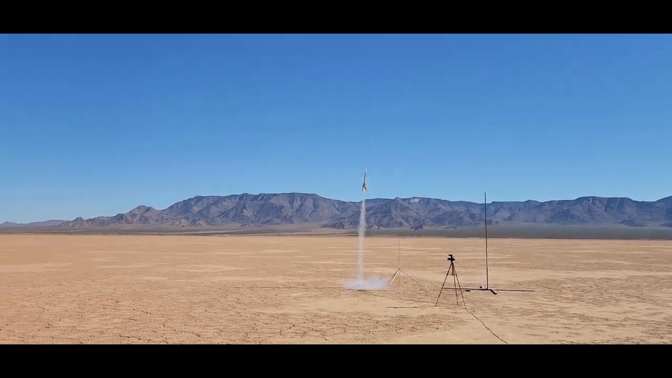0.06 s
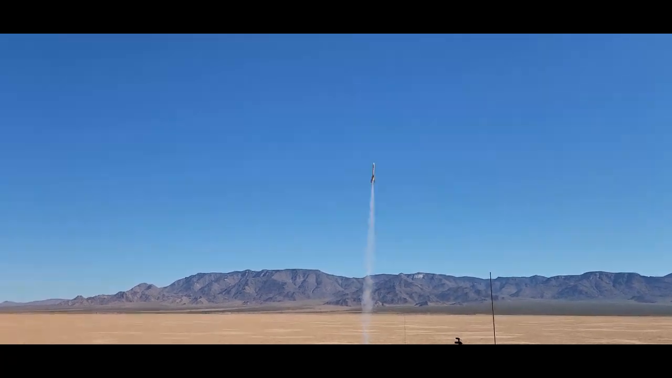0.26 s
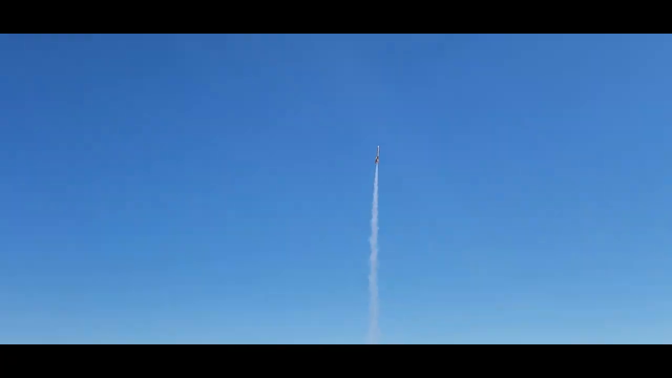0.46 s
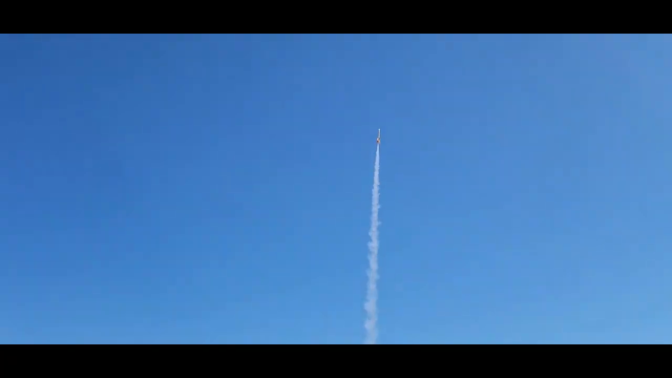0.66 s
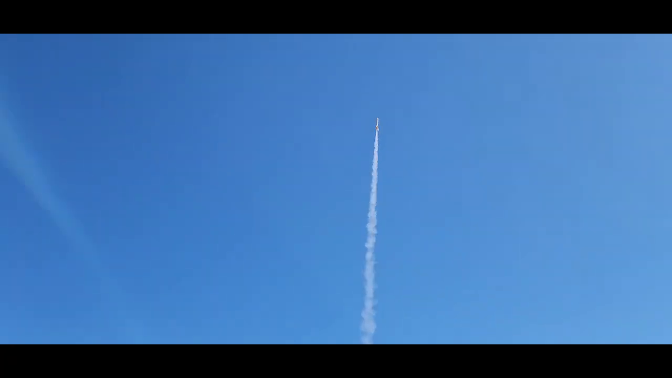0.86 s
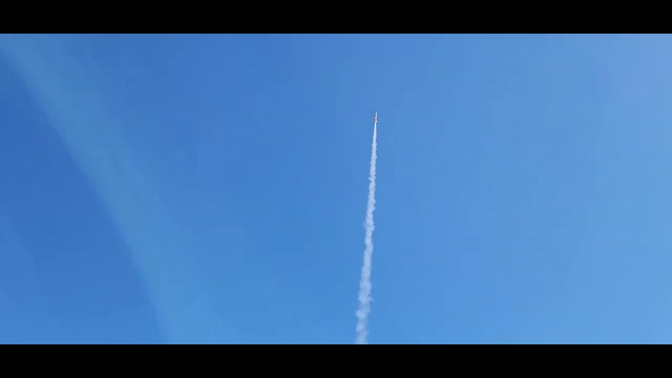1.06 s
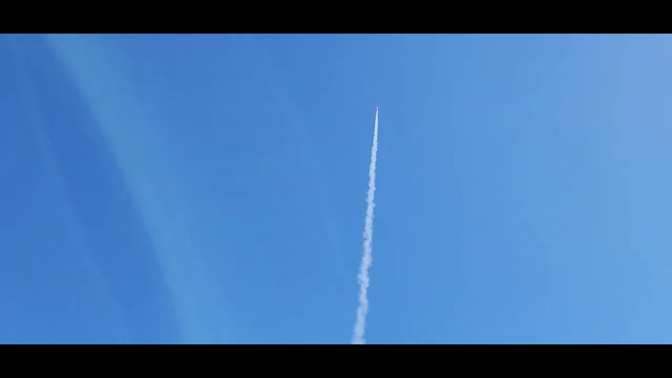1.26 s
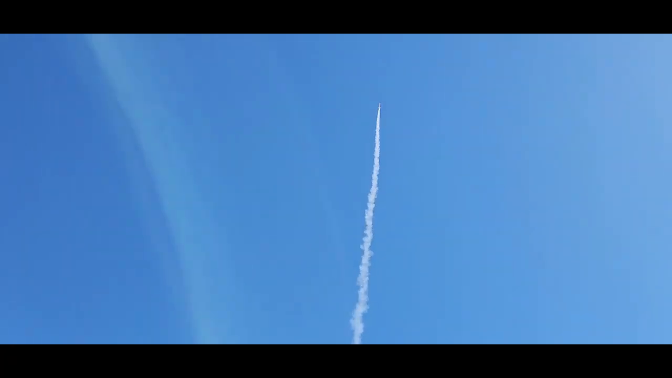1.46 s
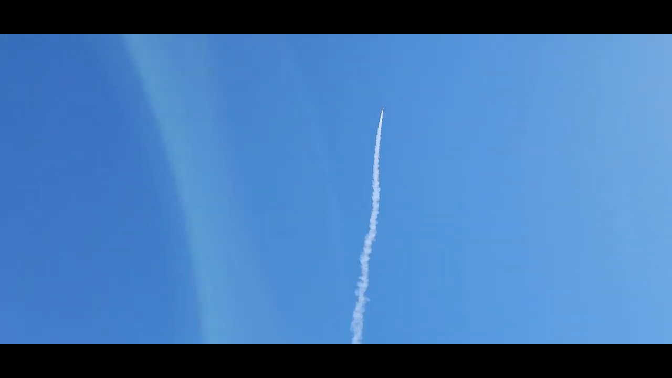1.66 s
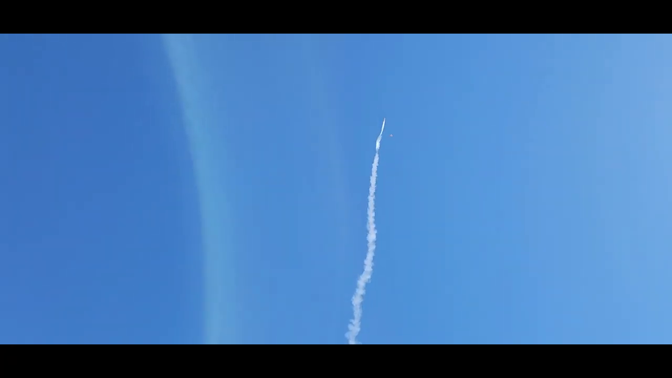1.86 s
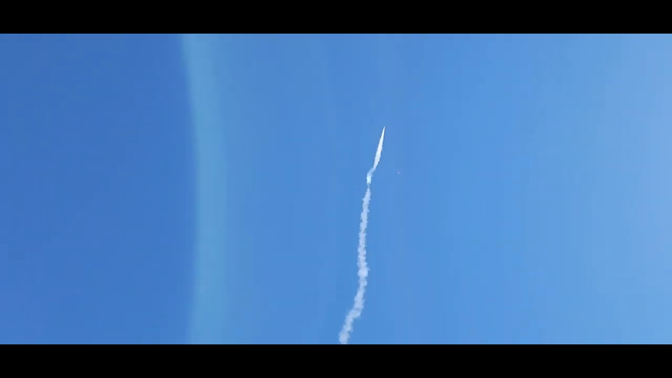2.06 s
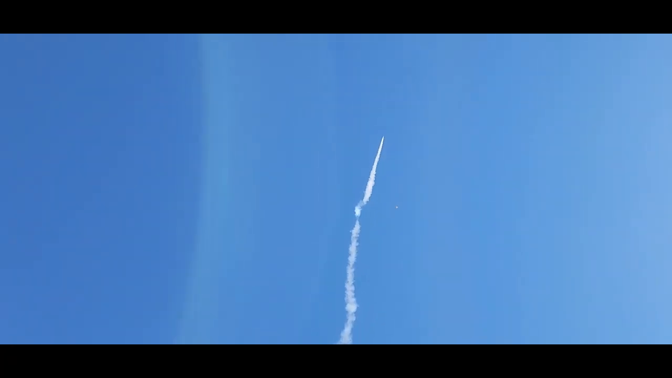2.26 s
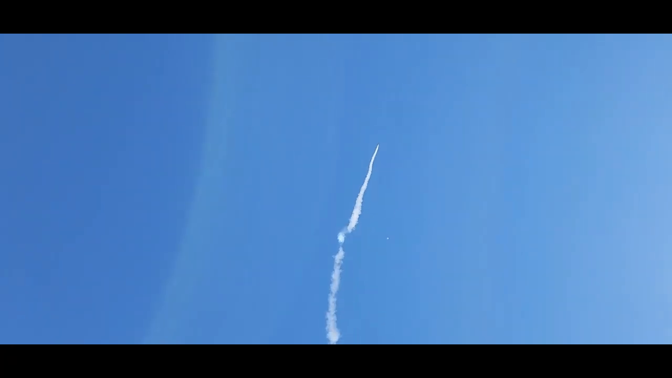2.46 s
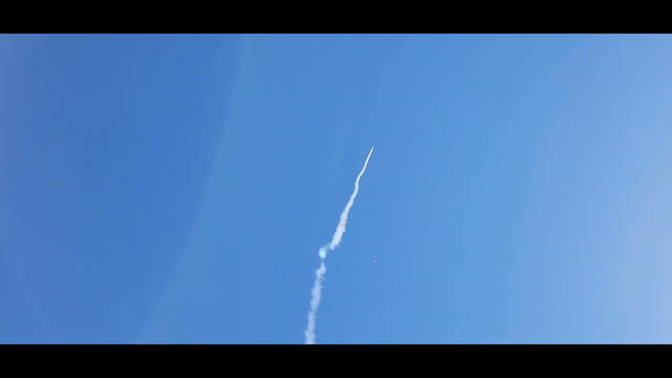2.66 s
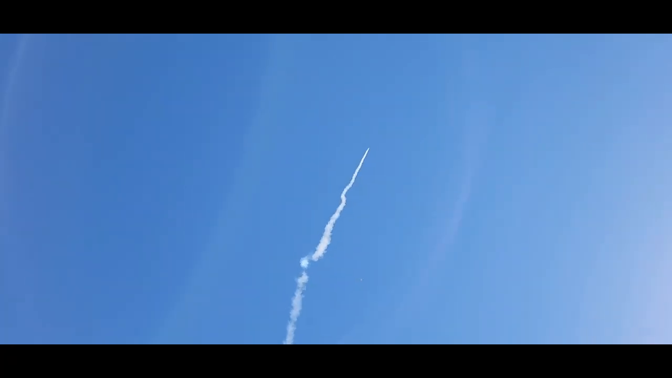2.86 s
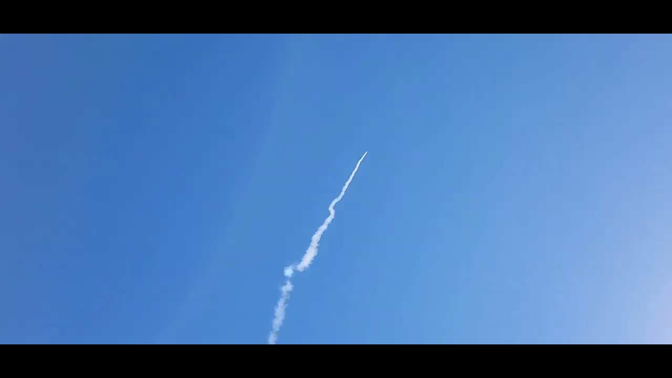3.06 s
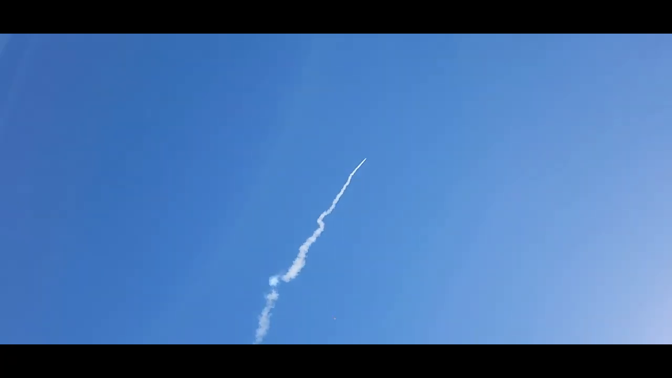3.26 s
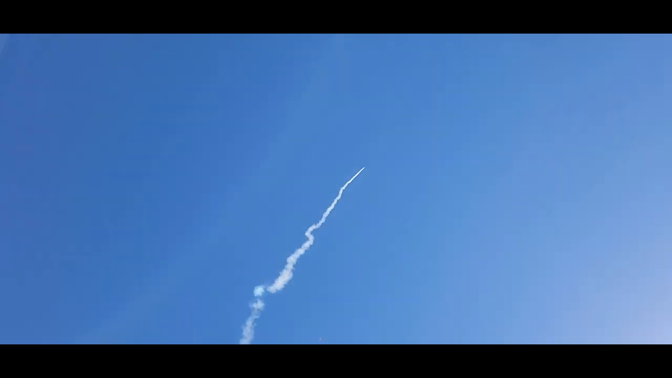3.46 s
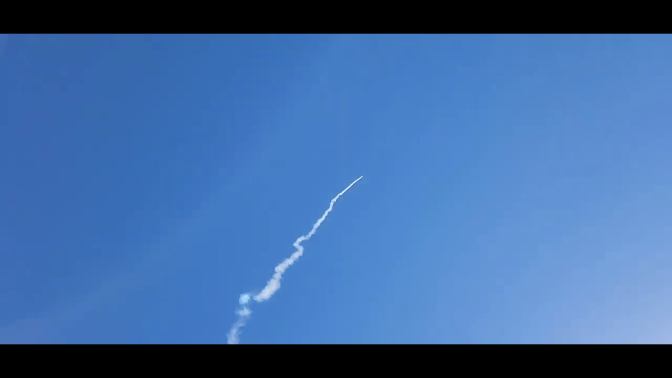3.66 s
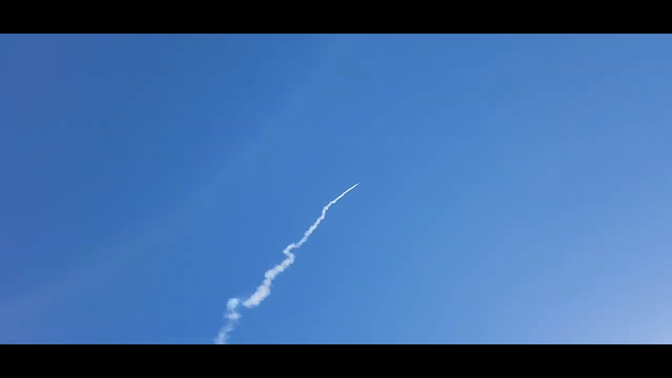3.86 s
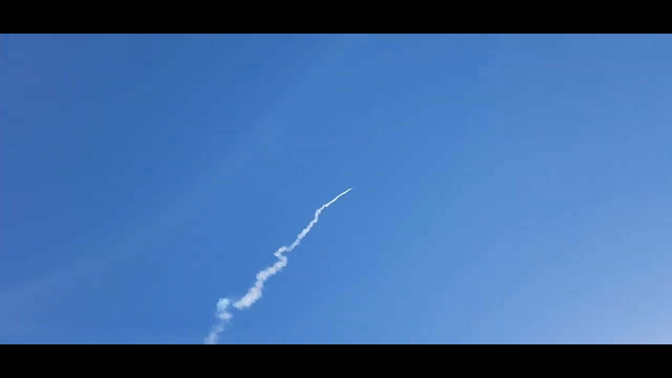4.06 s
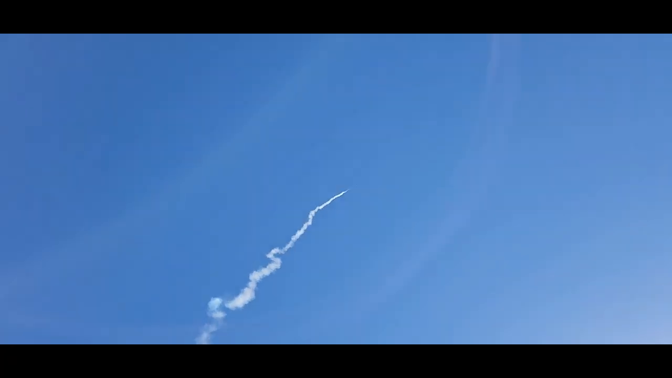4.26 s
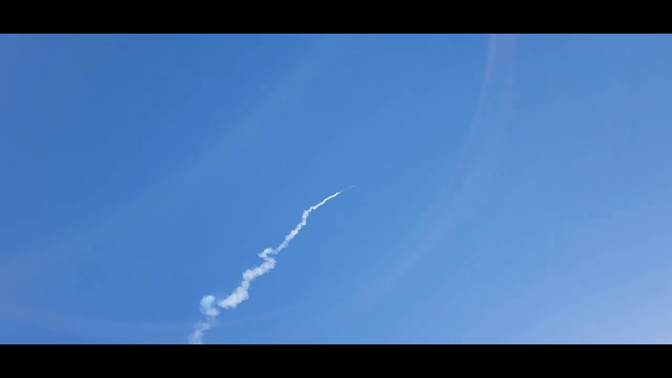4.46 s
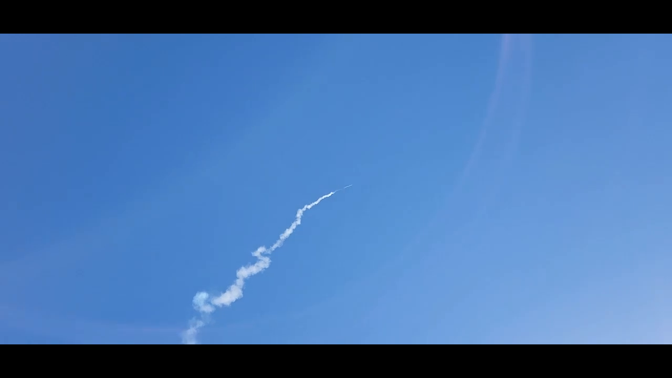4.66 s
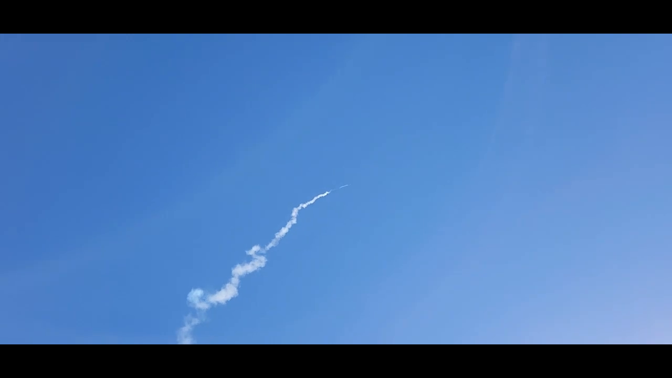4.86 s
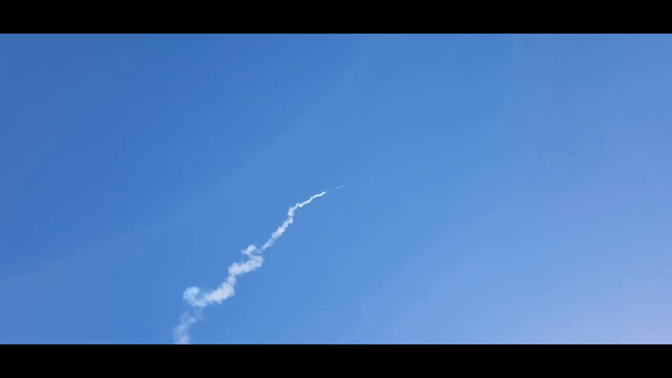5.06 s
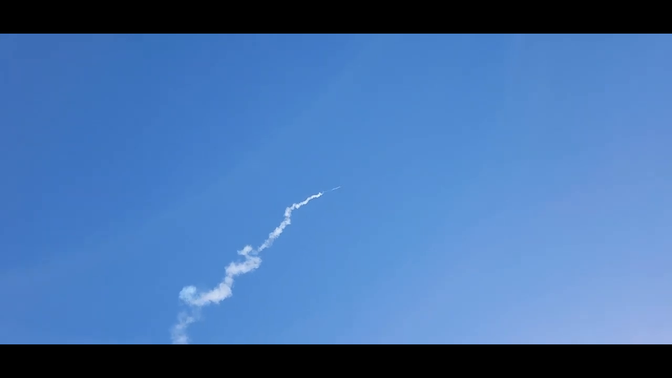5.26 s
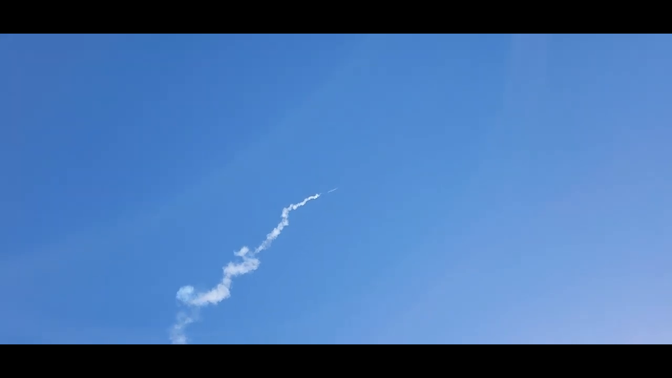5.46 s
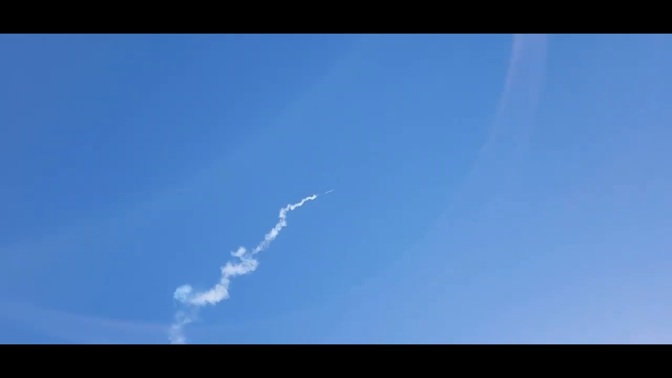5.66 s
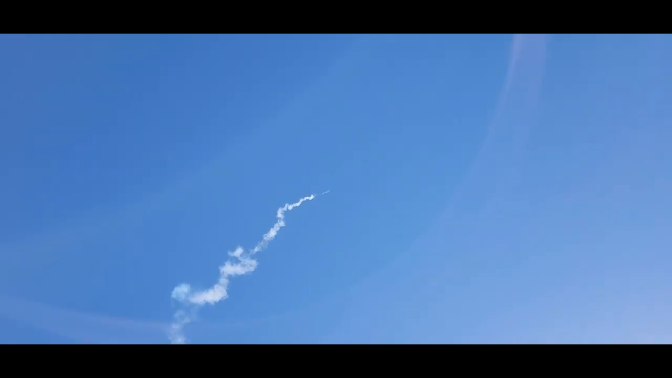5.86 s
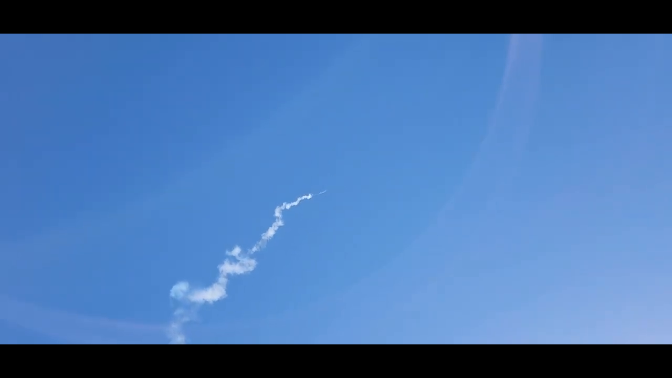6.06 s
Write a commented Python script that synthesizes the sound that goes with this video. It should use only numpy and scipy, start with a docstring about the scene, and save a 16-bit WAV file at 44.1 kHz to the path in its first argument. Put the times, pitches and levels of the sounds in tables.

```python
"""A two-stage model rocket climbs from a dry lake bed, heard by a hand-held stereo camera.
From 0 s the first motor's jet hisses and sputters; the lag of the ground echo grows with the climb,
sweeping a comb down through the hiss. At 1.76 s the motor cuts out. Near 2 s the second one catches,
flares with a low whump, then fades with height and burns out at 4.14 s. Two faint knocks follow.
Light wind rumbles on the microphone throughout and is left at the end, over a faint hiss."""
import sys
import numpy as np
from scipy import signal
from scipy.fft import rfft, irfft
from scipy.io import wavfile
from scipy.ndimage import uniform_filter1d, map_coordinates

SR = 44100
rng = np.random.default_rng(int(sys.argv[2]) if len(sys.argv) > 2 else 0)


def persist_wave(psi):
    """Save psi, clipped to +-1, as 16-bit WAV."""
    counts = np.round(np.clip(psi, -1, 1) * 32767).astype(np.int16)
    wavfile.write(sys.argv[1], SR, np.atleast_2d(counts).T)


N = 269563
FRAME, HOP = 512, 128
TIME_S, FRAME_S = np.arange(N) / SR, np.arange(N // HOP + 5) * HOP / SR
BINS_HZ = np.fft.rfftfreq(FRAME, 1 / SR)
JET_BAND_HZ, ROAR_BAND_HZ, SIZZLE_BAND_HZ = (2000, 4000), (400, 1400), (8000, 15000)

# Table levels are relative.
# exhaust spectra: freq_hz, density_db
FIRST_JET_SPECTRUM = [(100, -29), (300, -25.5), (700, -22.5), (1400, -17), (2000, -6.5), (2650, -1),
                      (3300, -3.5), (4100, -9), (5200, -9.5), (7500, -11.5), (11000, -16), (13000, -16),
                      (15500, -23)]
SECOND_JET_SPECTRUM = [(100, -33), (220, -32.5), (400, -21), (800, -16), (1400, -11.5), (1850, -6),
                       (2600, -4), (3600, -4), (5000, -10.5), (7500, -15.5), (9500, -21.5), (12000, -21),
                       (15500, -35.5)]
# reach of the roar and sizzle controls: freq_hz, weight
ROAR_WEIGHTS = [(150, 0.68), (450, 1.5), (800, 1.1), (1300, 0.9), (1900, 0)]
SIZZLE_WEIGHTS = [(3000, 0.0047), (4800, 0.53), (7500, 0.9), (11000, 1.325), (15000, 1.57)]
# uneven burning: centre_s, gain_db, half_width_s
SURGES = [(0.177, 2, 0.075), (0.51, 1.5, 0.072), (1.115, 1.34, .08), (2.39, 2, 0.056), (2.982, 1.46, 0.39),
          (3.621, 1.4, 0.039)]
# sputters of the fuel grain: start_s, level_db, tilt_db_per_octave
SPUTTERS = [(0.423, -26, 4.5), (0.578, -25.5, -2.5), (0.675, -29.5, -3), (0.748, -29, -2), (0.874, -31, -3),
            (0.962, -32.5, -3.5), (1.13, -28, -2.5), (1.767, -25.5, 0), (3.008, -34.5, 1.2), (3.16, -36, 3),
            (3.431, -37.5, 0.5), (3.455, -42.5, -6.5), (3.757, -35.5, 1), (3.947, -30.5, .5),
            (4.084, -38, 1.5), (4.102, -37.5, 1.5)]
# sputter colour: freq_hz, gain_db
SPUTTER_EQ = [(50, -18.5), (160, -1), (600, 1.5), (1400, 2.5), (2300, -9), (8000, -42)]
# ignition puff: freq_hz, density_db
WHUMP_SPECTRUM = [(120, -32), (230, -20), (340, -5.5), (560, -0.5), (800, -6.5), (1600, -34.5)]
# line of sight to the rocket: time_s, elevation_sine
CLIMB = [(0, 0.068), (.25, .22), (.5, 0.38), (.75, 0.56), (1, 0.71), (1.25, 0.88), (1.5, .86), (2, 0.92),
         (3, 0.97), (4, 0.9)]
# reflections near the camera: delay_s, gain
NEAR_ECHOES = [(.0014, 0.002), (.0028, 0.097), (.0045, 0.074), (.0069, .32), (.0075, -0.09)]
# port imbalance, source ahead and overhead: freq_hz, left_minus_right_db
BALANCE_AHEAD = [(300, 1), (900, -1), (1500, 6), (2700, -6), (3700, 0.5), (4800, -5), (6500, 0.5),
                 (9300, 2.5), (12500, -3), (14500, 8.5)]
BALANCE_OVERHEAD = [(300, 0.5), (1100, 0), (1900, -7), (2700, -7.5), (3400, -10), (4200, -0.5), (5200, 6),
                    (6500, 9), (8300, 8), (9300, 2), (10200, 1), (12500, 1), (14500, 7)]
# likeness of the two ports: freq_hz, coherence
PORT_COHERENCE = [(200, 1), (1000, 0.58), (1700, 0.63), (2600, .85), (3800, 0.51), (5000, 0.53), (9000, 1),
                  (12000, 0.33), (14500, 0.32)]
# port phase, source overhead: freq_hz, left_lead_rad
PORT_PHASE = [(200, -0.5), (1200, 0.45), (1900, -2.5), (2500, 0.5), (3200, 2), (3800, 4), (4600, 7),
              (8500, 7.5), (11000, 8.5), (15000, 12)]
# port peaks and dips, source ahead: centre_hz, width_hz, gain_db
PORT_RESONANCES = [(2270, 700, -5), (2856, 410, 3.5), (4484, 472, 0), (4953, 1300, 4.5), (9030, 1400, -7.5)]
# lake bed scatter: freq_hz, gain_db
SCATTER_EQ = [(200, -7), (1200, -5), (2300, -4.5), (3600, 3.5), (8000, 1.5), (15000, -7.5)]
# knocks after burnout: start_s, level_db
KNOCKS = [(4.318, -58), (4.346, -48.5)]
# ring of a knock: pitch_hz, level_db, t60_s
KNOCK_MODES = [(371, -4.5, 0.054), (1236, -8, .04), (2500, 6, 0.013)]
# gusts on the microphone: start_s, level_db, rise_s
GUSTS = [(.01, -40, 0.099), (.45, -45, 0.065), (.93, -54, 0.12), (3.5, -57.5, 0.28), (4.24, -54, 0.22),
         (4.96, -52, 0.16), (5.5, -58.5, .2)]
# wind rumble: freq_hz, density_db
WIND_SPECTRUM = [(15, -15.5), (30, -2.5), (50, 4), (80, -4), (180, -24.5), (300, -43), (800, -67.5)]
# still air and microphone hiss: freq_hz, density_db
HISS_SPECTRUM = [(200, -10), (400, -6), (1600, -9.5), (2050, -2.5), (3000, -5), (4600, -13), (5600, -12),
                 (6800, -18.5), (7600, -14.5), (9200, -32.5), (12500, -16), (15500, -16)]


def first_motor(build_s=.31, cutout_s=1.761, cut_length_s=.025, fizz_db_per_s=94):
    """Booster: builds up off the pad as its roar thins, then cuts out to a weak, broad fizz."""
    on_pad = np.exp(-FRAME_S / build_s)
    # sizzle beams sideways, so it drops as the nozzle turns to the camera
    turned = (1 + np.tanh((elevation(FRAME_S) - .63) / .17)) / 2
    spent = np.minimum(since(cutout_s) / cut_length_s, 1)
    level_db = -26 - 9.5 * on_pad + surges_db() - 36 * spent - fizz_db_per_s * since(cutout_s)
    roar_db = -18.5 + 6.5 * on_pad + 19 * spent
    sizzle_db = 5 - 11 * turned + 7 * spent
    return jet(FIRST_JET_SPECTRUM, level_db, roar_db, sizzle_db)


def second_motor(full_s=1.9945, flare_s=2.085, burnout_s=4.137, catch_db_per_s=420, die_db_per_s=311):
    """Upper stage: catches, flares, recedes, burns out. Distance dulls the sizzle; the roar carries."""
    burnt = np.minimum(since(full_s) / (burnout_s - full_s), 1)
    flare = np.exp(-((FRAME_S - flare_s) / .075) ** 4)
    thrust_db = -catch_db_per_s * np.maximum(full_s - FRAME_S, 0) - die_db_per_s * since(burnout_s)
    near = np.exp(-(since(full_s) / .87) ** 1.9)
    level_db = -27.5 + thrust_db + surges_db() + 7.5 * flare - 13.5 * burnt ** 1.71
    roar_db = -17.5 + 1.8 * flare + 9 * burnt ** 3.7
    sizzle_db = -24.5 + 15.5 * near - 4 * flare
    return jet(SECOND_JET_SPECTRUM, level_db, roar_db, sizzle_db)


def surges_db():
    """Uneven burning swells the thrust."""
    return sum(db * np.exp(-((FRAME_S - centre_s) / half_s) ** 2) for centre_s, db, half_s in SURGES)


def jet(spectrum, level_db, roar_db, sizzle_db, flutter_db=.6, twinkle_db=.39, crackle=.092):
    """Turbulent exhaust, two noise rows. Level sets the jet band; roar and sizzle are relative to it."""
    base_db = lookup(spectrum, BINS_HZ)
    base_db -= band_db(base_db, JET_BAND_HZ)
    bass_db = roar_db[:, None] - band_db(base_db, ROAR_BAND_HZ)
    treble_db = sizzle_db[:, None] - band_db(base_db, SIZZLE_BAND_HZ)
    treble_db += twinkle_db * wander(rate_hz=12)[:, None]
    field_db = base_db + bass_db * lookup(ROAR_WEIGHTS, BINS_HZ)
    field_db += treble_db * lookup(SIZZLE_WEIGHTS, BINS_HZ)
    field_db -= band_db(field_db, JET_BAND_HZ)
    field_db += (level_db + flutter_db * wander(rate_hz=14))[:, None]
    # steepened shock fronts give a fine crackle
    roughness = unit_rms(uniform_filter1d(rng.standard_normal(N), size=40))
    shocks = unit_rms(np.exp(crackle * roughness))
    spectra = air_turbulence(stft(shocks * rng.standard_normal((2, N))))
    return istft(spectra * gain_of(field_db[:spectra.shape[1]]) * np.sqrt(FRAME / 2))


def sputters(gain_db=11, pulse_s=.00028, puff_s=.005, pivot_hz=600):
    """Bits of fuel pass the nozzle: a pressure pulse and a ragged puff each."""
    out, t = np.zeros(N), np.arange(2000) / SR
    middle = len(t) // 2
    pulse = (1 - t / pulse_s) * np.exp(-t / pulse_s)
    octaves = np.clip(np.log2((np.fft.rfftfreq(len(t), 1 / SR) + 1) / pivot_hz), -2, 2)
    for start_s, db, tilt_db_per_octave in SPUTTERS:
        puff = .84 * rng.standard_normal(len(t)) * np.exp(-t / puff_s)
        spectrum = rfft(np.roll(pulse + puff, middle))
        pop = irfft(spectrum * gain_of(db + gain_db + tilt_db_per_octave * octaves))
        add(out, start_s - middle / SR, pop)
    return coloured(out, SPUTTER_EQ)


def whump(level_db=-38.5, centre_s=2.095, half_s=.05):
    """The igniting charge puffs out a short, low burst of gas."""
    swell = np.exp(-((TIME_S - centre_s) / half_s) ** 2)
    return gain_of(level_db) * swell * unit_rms(coloured(rng.standard_normal(N), WHUMP_SPECTRUM))


def elevation(time_s):
    """Sine of the rocket's angle above the horizon."""
    return np.interp(time_s, *np.transpose(CLIMB))


def overhead(time_s):
    """Near 0 with the rocket ahead, 1 once it is above."""
    return np.clip(elevation(time_s) / .71, 0, 1) ** 2


def air_turbulence(spectra, depth_db=1.58, patch_hz=420, patch_s=.11):
    """Turbulent air on the path makes narrow bands swell and fade."""
    along_time = np.fft.fftfreq(spectra.shape[1], HOP / SR)[:, None] * patch_s
    along_freq = np.fft.fftfreq(len(BINS_HZ), BINS_HZ[1]) * patch_hz
    blur = np.exp(-2 * (along_time ** 2 + along_freq ** 2))
    patches = np.fft.ifft2(np.fft.fft2(rng.standard_normal(spectra.shape[1:])) * blur).real
    return spectra * gain_of(depth_db * unit_rms(patches))


def ground_echo(x, zenith_lag_s=.01175, grazing_gain=.48, zenith_gain=.27):
    """Adds the ground reflection, later and weaker as the rocket rises."""
    up = elevation(TIME_S)
    reflected = coloured(x, [(1500, 2), (5000, 4), (14000, -6)])
    gain = grazing_gain + (zenith_gain - grazing_gain) * up
    return x + gain * delayed(reflected, zenith_lag_s * up)


def near_echoes(x, drift=.151, sway=.0032):
    """Things near the camera comb the hiss; the paths shift as it tilts and sways."""
    swaying = np.interp(TIME_S, FRAME_S, wander(rate_hz=.99))
    stretch = 1 + drift * (elevation(TIME_S) - 1) + sway * swaying
    thin = coloured(x, [(350, -9.5), (1400, .5)])  # small surfaces return little bass
    echoes = sum(gain * delayed(thin, delay_s * stretch) for delay_s, gain in NEAR_ECHOES)
    return x + (1 + overhead(TIME_S)) / 2 * echoes


def microphone_ports(x, overhead_db=1, ahead_lag_s=.00002):
    """The camera body colours, shades and delays each port by elevation. Row 0 of x reaches both."""
    shared, unshared = stft(x)
    up = overhead(FRAME_S[:len(shared), None])
    balance_db = (1.5 - up) * lookup(BALANCE_AHEAD, BINS_HZ) + up * lookup(BALANCE_OVERHEAD, BINS_HZ)
    balance = gain_of(balance_db)
    phasor = (1 - up) * np.exp(-2j * np.pi * BINS_HZ * ahead_lag_s)
    phasor += up * np.exp(-1j * lookup(PORT_PHASE, BINS_HZ))
    coherence = np.clip(lookup(PORT_COHERENCE, BINS_HZ), 0, 1)
    right = (coherence * shared + np.sqrt(1 - coherence ** 2) * unshared) * np.exp(1j * np.angle(phasor))
    ahead_db = sum(db * np.exp(-(2 * (BINS_HZ - hz) / width_hz) ** 2)
                   for hz, width_hz, db in PORT_RESONANCES)
    colour = gain_of((1 - up) * ahead_db + up * overhead_db)
    return istft(np.array([shared * balance, right]) * 2 / (1 + balance) * colour)


def lake_bed_scatter(x, early_db=-23, early_t60_s=.38, late_db=-30.5, late_t60_s=2.1):
    """Rough ground scatters a quick wash and a faint long one; air dulls the longer paths."""
    t = np.arange(SR) / SR
    response = 0
    for db, t60_s in [(early_db, early_t60_s), (late_db, late_t60_s)]:
        tail = rng.standard_normal((2, SR)) * gain_of(-60 * t / t60_s) * (t > .012)
        response += gain_of(db) * tail / np.linalg.norm(tail[0])
    spectra = stft(coloured(response, SCATTER_EQ))
    air_db = -9 * FRAME_S[:spectra.shape[1], None] * (BINS_HZ / 4000) ** 2
    return signal.fftconvolve(x, istft(spectra * gain_of(air_db)), axes=1)[:, :N]


def knocks(scrape_s=.003, left_db=-8.5, right_db=-3.5):
    """Small dull knocks: a brief scrape excites damped modes."""
    out, t = np.zeros(N), np.arange(3000) / SR
    ring = sum(gain_of(db - 60 * t / t60_s) * np.sin(2 * np.pi * hz * t) for hz, db, t60_s in KNOCK_MODES)
    for start_s, db in KNOCKS:
        scrape = rng.standard_normal(len(t)) * np.exp(-t / scrape_s)
        add(out, start_s, gain_of(db) * signal.fftconvolve(scrape / np.linalg.norm(scrape), ring))
    return out * gain_of([[left_db], [right_db]])


def wind(gain_db=-1, breeze_db=-65, eddy_db=1.34, width=.4):
    """Eddies buffet the ports, first more the left, later the right; gusts rise fast and ebb slowly."""
    mid, side = unit_rms(coloured(rng.standard_normal((2, N)), WIND_SPECTRUM))
    lean_db = np.linspace(2, -5, N)
    rumble = np.array([mid + width * side, mid - width * side]) * gain_of([lean_db, -lean_db])
    power = gain_of(breeze_db) ** 2
    for start_s, db, rise_s in GUSTS:
        age = since(start_s) / rise_s
        power += (gain_of(db) * age * np.exp(1 - age)) ** 2
    strength = np.sqrt(power) * gain_of(gain_db + eddy_db * wander(rate_hz=8.6))
    return rumble * np.interp(TIME_S, FRAME_S, strength)


def hiss(gain_db=-76.5):
    """Still air and microphone noise, duller on the right."""
    left, right = unit_rms(coloured(rng.standard_normal((2, N)), HISS_SPECTRUM))
    left = coloured(left, [(2000, 3), (3000, -4), (6000, 2)])
    right = coloured(right, [(2000, 1), (3000, 2), (4500, -1.5), (6000, -10.5)])
    return gain_of(gain_db) * np.array([left, right])


def gain_of(db):
    """Decibels to amplitude."""
    return 10 ** (np.asarray(db) / 20)


def unit_rms(x):
    """Scales to rms 1."""
    return x / np.sqrt(np.mean(x ** 2) + 1e-20)


def lookup(points, hz):
    """Interpolates a table over log frequency."""
    points_hz, values = np.transpose(points)
    return np.interp(np.log(hz + 1), np.log(points_hz + 1), values)


def coloured(x, points):
    """Filters by rows of freq_hz, gain_db."""
    size = x.shape[-1]
    return irfft(rfft(x) * gain_of(lookup(points, np.fft.rfftfreq(size, 1 / SR))), size)


def band_db(field_db, band_hz):
    """Band level of a spectrum, or of each frame."""
    inside = (BINS_HZ >= band_hz[0]) & (BINS_HZ < band_hz[1])
    return 10 * np.log10(np.sum(gain_of(field_db[..., inside]) ** 2, -1, keepdims=True))


def wander(rate_hz):
    """Slow random motion of rms 1, per frame."""
    size = len(FRAME_S)
    hz = np.fft.rfftfreq(size, HOP / SR)
    return unit_rms(irfft(rfft(rng.standard_normal(size)) * hz / (rate_hz ** 3 + hz ** 3), size))


def since(start_s):
    """Seconds elapsed per frame, 0 before the start."""
    return np.maximum(FRAME_S - start_s, 0)


def delayed(x, delay_s):
    """Time-varying delay of both rows."""
    return np.array([map_coordinates(row, [(TIME_S - delay_s) * SR], order=3) for row in x])


def add(mix, start_s, sound):
    """Mixes a sound in place."""
    part = mix[max(round(start_s * SR), 0):][:len(sound)]
    part += sound[:len(part)]


def stft(x):
    """Short-time spectra: channels x frames x bins."""
    return signal.stft(x, nperseg=FRAME, noverlap=FRAME - HOP)[2].swapaxes(1, 2)


def istft(spectra):
    """Short-time spectra to samples."""
    return signal.istft(spectra.swapaxes(1, 2), nperseg=FRAME, noverlap=FRAME - HOP)[1][:, :N]


def scene():
    """Both motors through echoes, ports and scatter, over knocks, wind and hiss."""
    exhaust = first_motor() + second_motor()
    exhaust[0] += sputters() + whump()
    rocket = microphone_ports(near_echoes(ground_echo(exhaust)))
    return rocket + lake_bed_scatter(rocket) + knocks() + wind() + hiss()


def record(dry):
    """The recorder's band limit."""
    cutoff_hz = 15850
    lowpass = signal.firwin(511, cutoff_hz, window=("kaiser", 9), fs=SR)
    return signal.oaconvolve(dry, lowpass[None], "same")


dry = scene()
out = record(dry)
persist_wave(out)
```